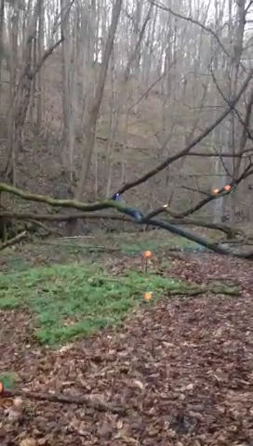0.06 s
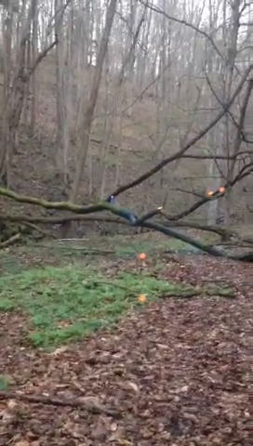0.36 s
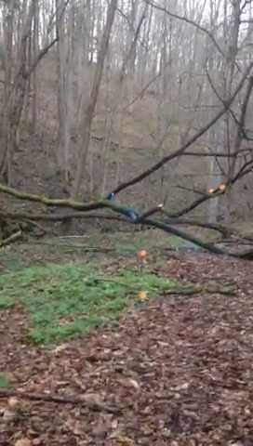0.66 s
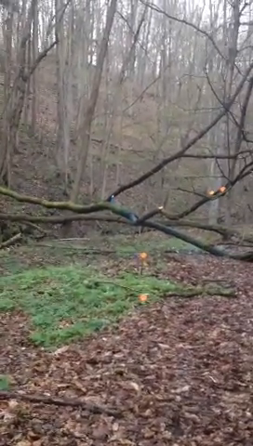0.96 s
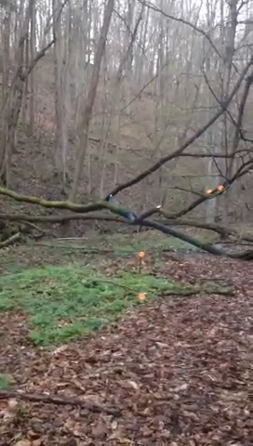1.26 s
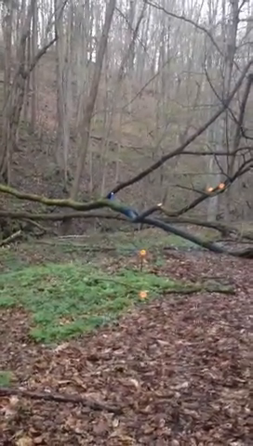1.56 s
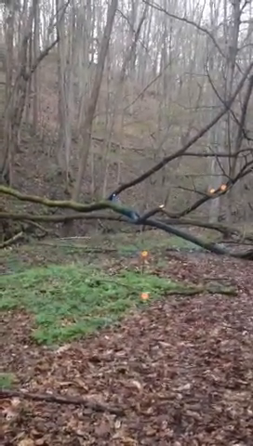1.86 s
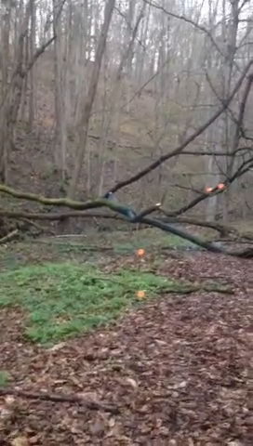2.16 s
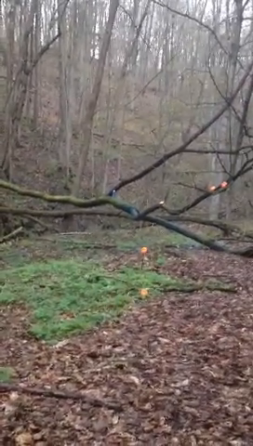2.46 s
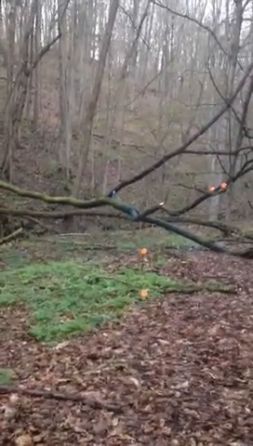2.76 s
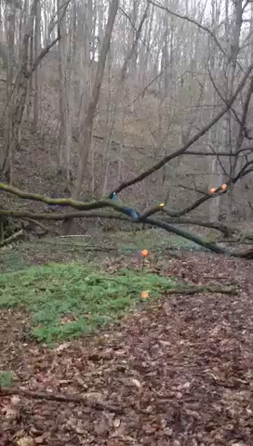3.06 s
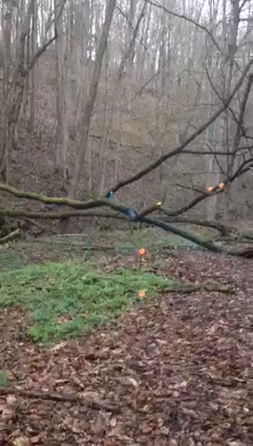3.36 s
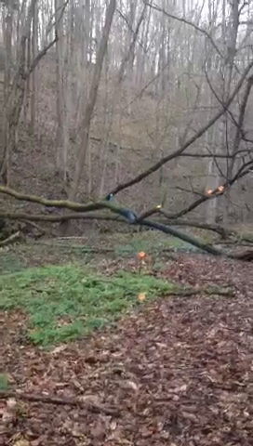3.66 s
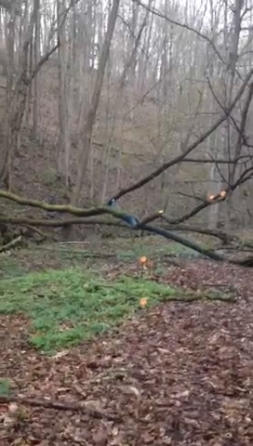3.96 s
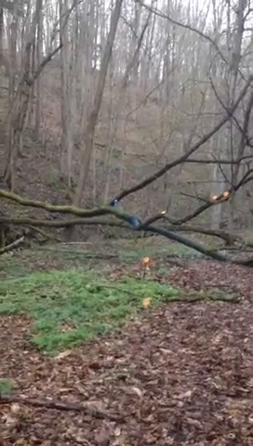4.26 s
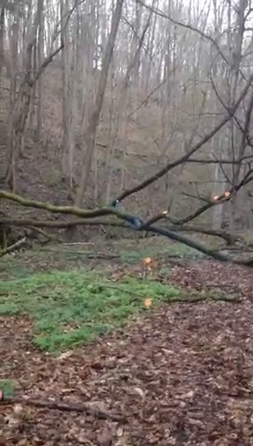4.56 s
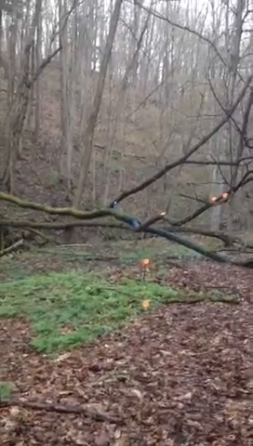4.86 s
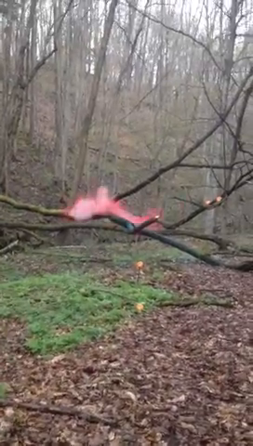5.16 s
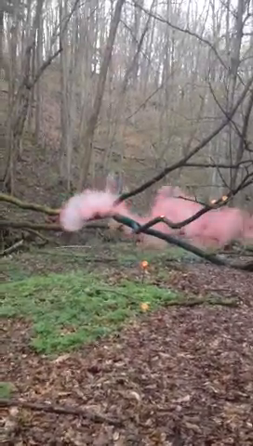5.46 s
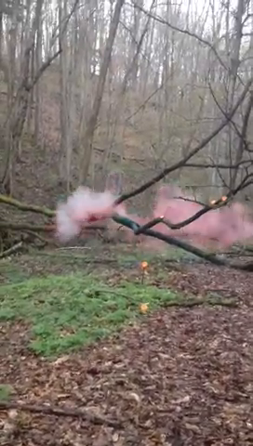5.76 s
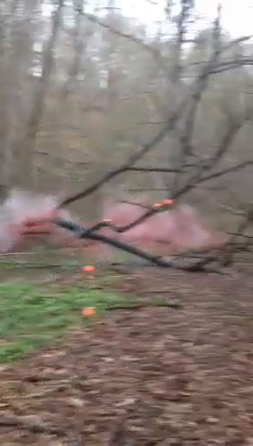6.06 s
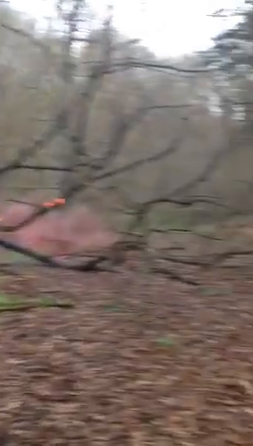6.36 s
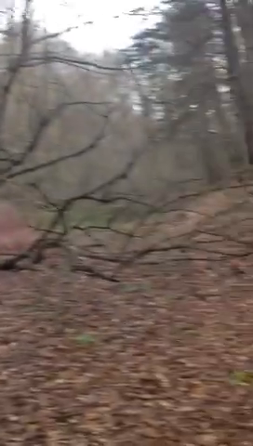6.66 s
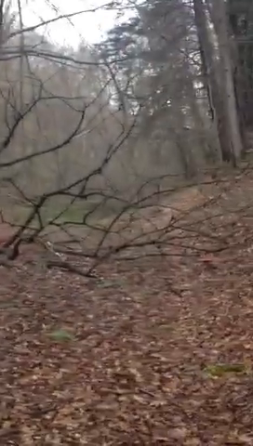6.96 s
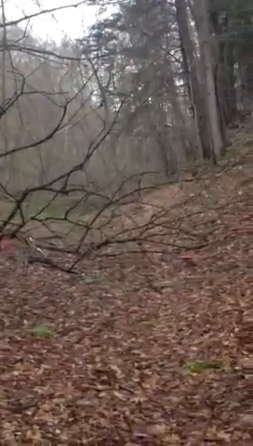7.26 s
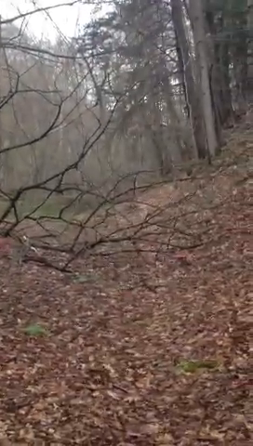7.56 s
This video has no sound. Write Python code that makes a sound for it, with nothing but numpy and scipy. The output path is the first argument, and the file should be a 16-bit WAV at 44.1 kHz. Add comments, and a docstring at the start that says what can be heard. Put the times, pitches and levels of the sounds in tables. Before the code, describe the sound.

A rifle shot cracks in quiet woods, bursting a spray can with a brief hiss and long echo, then the rifle's action clicks.

```python
"""A small-calibre rifle fires close by in a wooded valley; a moment later the bullet bursts a spray can.
Both bangs are clusters of pressure fronts. Gas sputters out of the torn can while trunks and slopes
throw the sound back, duller and duller; then the rifle's steel action clicks and rings.
Underneath: quiet forest air, a wavering far-off drone, a few twigs and rustles, faint bird peeps."""
import sys
import numpy as np
from scipy import signal
from scipy.fft import rfft, irfft, next_fast_len
from scipy.io import wavfile
from scipy.ndimage import uniform_filter1d, map_coordinates

SR = 44100
rng = np.random.default_rng(int(sys.argv[2]) if len(sys.argv) > 2 else 0)


def to_wav(s):
    """Save 16-bit WAV."""
    ch = np.atleast_2d(s).T  # columns
    pcm = np.round(np.clip(ch, -1, 1) * 32767)  # PCM
    wavfile.write(sys.argv[1], SR, pcm.astype(np.int16))


N = 340182
TIME = np.arange(N) / SR


def amp(db):
    """Decibels to gain."""
    return 10 ** (np.asarray(db) / 20)


def unit(x):
    """Scale to rms 1."""
    return x / np.sqrt(np.mean(x ** 2) + 1e-20)


def peak(x):
    """Scale to peak 1."""
    return x / np.abs(x).max()


def along(points, hz):
    """Read (f/Hz, value) points on a log frequency axis."""
    freqs, values = np.transpose(points)
    return np.interp(np.log(hz + 1), np.log(freqs + 1), values)


def automation(points):
    """Join (t/s, value) points into one value per sample."""
    return np.interp(TIME, *np.transpose(points))


def wobble(rate):
    """A smooth random curve with rate knots a second."""
    return map_coordinates(rng.standard_normal(int(N * rate / SR) + 4), [TIME * rate])


def hump(s, half):
    """A smooth rise and fall around time s."""
    return np.exp(-.5 * ((TIME - s) / half) ** 2)


def fade(t, t60, rise):
    """Envelope that rises from t = 0 and dies away."""
    t = np.maximum(t, 0)
    return (1 - np.exp(-t / rise)) * np.exp(-np.log(1000) * t / t60)


def filtered(x, response):
    """x through a response given as a function of frequency."""
    size = next_fast_len(len(x) + 8192)
    return irfft(rfft(x, size) * response(np.fft.rfftfreq(size, 1 / SR)), size)[:len(x)]


def resonance(hz, centre, width):
    """Causal response of one resonance."""
    return 1j * hz * width / (centre ** 2 - hz ** 2 + 1j * hz * width)


def knock(x, centre_hz, breadth=1.3):
    """x through the same damped resonance twice."""
    return filtered(x, lambda hz: resonance(hz, centre_hz, breadth * centre_hz) ** 2)


def noise(spectrum, size=N):
    """Noise of rms 1, coloured by (f/Hz, level/dB) points."""
    return unit(filtered(rng.standard_normal(size), lambda hz: amp(along(spectrum, hz))))


def band(centre_hz, width_hz, drift_hz):
    """Narrow noise of rms 1 whose centre wanders."""
    phase = 2 * np.pi * np.cumsum(centre_hz + drift_hz * wobble(6.5)) / SR
    return unit(wobble(width_hz) * np.sin(phase) + wobble(width_hz) * np.cos(phase))


def add(track, s, sound):
    """Mix a sound into the track at time s."""
    part = track[round(s * SR):][:len(sound)]
    part += sound[:len(part)]


def ambience():
    """A bed of steady forest air over a slowly heaving low rumble."""
    # spectra of the two layers: f/Hz, level/dB
    air_colour = [(25, 0), (60, -2), (120, 4), (400, -0.5), (700, 3.5), (1000, 3), (2000, -0.5), (4000, -4),
                  (4750, -2.5), (5050, -8), (7500, -6.5), (10000, -13.5), (15000, -10.5)]
    rumble_colour = [(25, -24), (60, -10), (90, -8), (125, 1), (180, -4), (245, 4), (320, -5.5), (400, 0),
                     (520, -17), (900, -52.5)]
    # the rumble's rise and fall: t/s, level/dB
    rumble_ride = [(0, -71.5), (.52, -61.5), (.7, -73.5), (1.05, -70), (1.5, -78.5), (1.95, -77),
                   (2.25, -69.5), (3.2, -69.5), (4.0, -76.5), (4.45, -73), (4.9, -64), (6.0, -79),
                   (6.9, -80.5), (7.35, -70), (7.7, -76)]
    rumble = amp(automation(rumble_ride) + .9 * wobble(9.9)) * noise(rumble_colour)
    air = amp(-64 - .05 * wobble(2.7)) * noise(air_colour)
    return rumble + air


def drone():
    """A hollow far-off drone wavers in two resonances and swells now and then."""
    # its slow rise and fall: t/s, level/dB
    ride = [(0, -65), (.5, -63), (1.1, -67.5), (1.8, -67.5), (2.4, -69), (3.2, -64.5), (3.9, -67.5),
            (4.9, -66), (6.3, -73.5), (7.0, -74.5), (7.7, -69)]
    # its resonances: f/Hz, width/Hz, drift/Hz, gain/dB
    hollows = [(494, 59, 11, -2), (581, 100, 18, -4.5)]
    # brief swells: t/s, level/dB, half length/s, f/Hz
    surges = [(0.07, -61, 0.073, 511), (0.473, -57.5, 0.028, 502), (1.13, -63.5, 0.056, 481),
              (1.337, -63, 0.02, 484), (2.537, -63.5, 0.061, 482), (2.862, -59, 0.026, 495),
              (2.977, -56, 0.035, 516.5), (3.65, -61, 0.044, 523), (4.03, -62, 0.045, 498.4),
              (4.824, -61, 0.034, 485), (7.568, -61.5, 0.042, 568)]
    steady = sum(amp(db) * band(hz, width, drift) for hz, width, drift, db in hollows)
    swells = sum(amp(db) * hump(s, half) * band(hz, width_hz=75, drift_hz=11)
                 for s, db, half, hz in surges)
    diffuse = amp(-73) * band(540, width_hz=260, drift_hz=20)  # scattered by the trees
    return amp(automation(ride) - .24 + 1.5 * wobble(7)) * steady + swells + diffuse


def bird():
    """A small bird gives thin rising peeps and one quick downward chip."""
    # calls: t/s, level/dB, f/Hz, half length/s, glide/(Hz/s)
    peeps = [(1.585, -68, 7150, .02, 14999), (4.723, -69, 7600, .025, 3000),
             (4.783, -53, 6500, 0.0019, -400000)]
    out = np.zeros(N)
    for s, db, hz, half, glide in peeps:
        u = np.clip((TIME - s) / half, -4, 4)
        pitch = hz * (1 + .01 * wobble(300)) + glide * half * u
        out += amp(db) * np.exp(-u ** 2) * np.sin(2 * np.pi * np.cumsum(pitch) / SR)
    return out


def handling():
    """Twigs tick and knock; clothes and dry leaves give grainy rustles."""
    # twigs and soft knocks: t/s, peak/dB, f/Hz, t60/s, bandwidth as a share of f
    twigs = [(0.351, -47.5, 1080, 0.031, 1), (0.4392, -48, 1330, .03, 0.97),
             (0.4768, -38, 2000, 0.007, 1.2), (.523, -47, 870, 0.11, 1.1), (0.578, -48, 1500, 0.017, 1.4),
             (1.8978, -51.5, 4000, .04, .4), (1.901, -55, 1110, 0.049, .5), (2.1891, -60, 2680, .07, .12),
             (3.4298, -56, 3400, .015, .25), (3.73, -54, 4600, 0.023, .18), (4.4954, -56, 4300, .02, .3),
             (5.5863, -38, 9000, .025, 1.3), (5.6397, -40, 7500, .015, 0.82), (5.7105, -43, 9000, .02, 1.3),
             (5.718, -49.5, 250, .1, 0.51), (5.9485, -52, 6200, .025, .25), (7.0929, -59, 5500, .01, .5)]
    # clothes and leaves stirring: t/s, level/dB, half length/s
    rustles = [(0.213, -60, 0.055), (0.475, -68, 0.12), (0.572, -59.5, 0.025), (5.596, -52, 0.0084),
               (5.648, -59, 0.008), (5.726, -49.5, 0.016), (5.786, -59, 0.026), (6.053, -63.5, 0.015),
               (6.141, -58.5, 0.04), (6.336, -60, 0.032), (6.434, -64.5, 0.025), (6.51, -66, 0.045),
               (6.832, -70, 0.09)]
    # rustle spectrum: f/Hz, level/dB
    leaf_colour = [(40, -30), (100, -14), (250, 6), (1000, 5), (4500, 2.5), (7500, 2), (10000, -3.5),
                   (15000, -5)]
    out, t = np.zeros(N), TIME[:SR // 8]
    for s, db, pitch_hz, t60, breadth in twigs:
        contact = rng.standard_normal(len(t)) * fade(t, t60, rise=.000083)
        add(out, s, amp(db) * peak(knock(contact, pitch_hz, breadth)))
    stir = sum(amp(db) * hump(s, half) for s, db, half in rustles)
    grain = unit(noise(leaf_colour) * amp(1.8 * wobble(460) + 1.7 * wobble(90)))
    return out + stir * grain


def action(bounces_per_s=460):
    """Each steel contact in the rifle's action snaps, chatters and rings the parts at new strengths."""
    # contacts: t/s, level/dB, low ring/dB, low ring/Hz, treble/dB, snap/Hz
    clicks = [(6.099, -50, -11, 1920, -19, 7500), (6.119, -41, -7, 1896, -27, 3500),
              (6.128, -45, -12, 2030, -20, 5500), (6.1922, -46, -18, 1930, -18, 7000),
              (6.2702, -37, -23, 1980, -4, 12000), (6.3922, -39.5, -13, 2300, -5, 7500),
              (6.4226, -43.5, -10, 2010, -16, 6000), (6.5376, -46, -17, 1940, -12, 6000),
              (6.5886, -37.5, -18.5, 1900, -23, 6400), (6.608, -45, -1.5, 1900, -26, 3500),
              (6.7322, -41, -14.5, 2300, -18, 7400), (6.776, -49, -10, 1960, -20, 4000),
              (6.7966, -37.5, -12, 1905, -26, 5500), (6.8132, -43, -11, 2020, -28, 5500),
              (6.8349, -34.5, -17.5, 2220, -16, 6200), (6.879, -45.5, -12, 2030, -9, 7000),
              (7.2768, -47.5, -13, 1930, -12, 6000)]
    # modes of the steel: f/Hz, level/dB, t60/s
    steel = [(2250, -9, .092), (2870, -17, .07), (3760, -3, 0.066), (3990, -2.5, .045), (5600, -13, .05),
             (6630, -13, .05), (7240, -5, .045), (9400, -19, .05), (10800, -10, .05), (11400, -13, .06)]
    out, t = np.zeros(N), TIME[:SR // 4]
    for s, db, ring_db, ring_hz, treble_db, snap_hz in clicks:
        strike = [(hz * rng.normal(1, .02), level + rng.normal(0, 3.5), t60) for hz, level, t60 in steel]
        modes = sum(amp(level) * np.sin(2 * np.pi * hz * t) * fade(t, t60, rise=.00022)
                    for hz, level, t60 in strike)
        waver = np.cumsum(rng.normal(0, .09, len(t)))
        low_ring = np.sin(2 * np.pi * ring_hz * t + waver) * fade(t, t60=.09, rise=.0006)
        # light, bright contacts ring the parts less than heavy, dull ones
        ring = amp(-24 - treble_db / 3) * modes + amp(ring_db) * low_ring
        colour = [(100, -48), (600, -3), (2000, -12), (4000, -7.5), (7000, -6),
                  (10000, treble_db + 3), (15000, treble_db + 2)]
        tick = amp(-14.5) * noise(colour, size=len(t)) * fade(t, t60=.032, rise=.00017)
        bounces = rng.standard_normal(len(t)) * (rng.random(len(t)) < bounces_per_s / SR)
        bounces *= fade(t, t60=.077, rise=.001)
        contact = rng.standard_normal(len(t)) * fade(t, t60=.008, rise=.0001)
        snap = peak(filtered(contact, lambda hz: resonance(hz, snap_hz, snap_hz / 4)))
        chatter = amp(-8.5) * signal.fftconvolve(bounces, snap)[:len(t)]
        scrape = amp(-26.5) * noise(colour, size=len(t)) * fade(t, t60=.22, rise=.0038)
        add(out, s, amp(db) * (ring + amp(-5) * snap + chatter + tick + scrape))
    return out


def forest(start_s=5.06, returns_per_s=1500):
    """Countless trunks scatter the bang; the longer the path, the more treble the air has taken."""
    # starting spectrum of the echo: f/Hz, level/dB
    colour = [(40, -41.5), (75, -28.5), (120, -13.5), (250, -9.5), (450, -10.5), (700, -6), (1000, -4),
              (1800, -0.5), (3000, 1), (4700, 2.5), (5100, -2.5), (7500, 0.5), (10000, -5.5), (15000, -11)]
    # its decay: f/Hz, t60/s
    decay = [(60, 0.42), (150, 1.4), (300, 1.3), (600, 3.16), (1200, 2.77), (2000, 2.4), (3200, 1.52),
             (4500, 1.37), (7500, 1.01), (11000, 0.85), (15000, 0.87)]
    # hillsides sending back broad waves of echo: t/s, gain/dB, half length/s
    hillsides = [(5.117, 2, 0.034), (5.24, 2, 0.025), (5.896, 2.5, 0.12)]
    returns = rng.standard_normal(N) * (rng.random(N) < returns_per_s / SR)
    scatter = rng.standard_normal(N) + amp(-7) * unit(returns)
    scatter = unit(filtered(scatter, lambda hz: amp(along(colour, hz))))
    hz, t, spectrogram = signal.stft(scatter, SR, nperseg=512)
    loss = np.exp(-np.log(1000) * np.maximum(t - start_s, 0) / along(decay, hz)[:, None])
    # groups of trees favour different bands from moment to moment
    patches = uniform_filter1d(rng.standard_normal(spectrogram.shape), size=7, axis=0)
    groves_db = unit(uniform_filter1d(patches, size=5, axis=1))
    tail = signal.istft(spectrogram * loss * amp(groves_db), SR, nperseg=512)[1][:N]
    hills_db = sum(db * hump(s, half) for s, db, half in hillsides)
    # the echo builds as the bang reaches more trees
    build_db = -5.5 * np.exp(-np.maximum(TIME - start_s, 0) / .028)
    onset = np.clip((TIME - start_s) / .005, 0, 1)
    return amp(-22.5 + hills_db + build_db + .77 * wobble(55)) * tail * onset


def trunks():
    """Each trunk returns the crack as one crisp slap; the brush around it adds a short, duller scatter."""
    # reflections: t/s, slap peak/dB, slap/Hz, brush/dB, brush/Hz, brush t60/s
    echoes = [(5.0748, -12, 4500, -28, 3500, .03), (5.0952, -7, 4500, -25, 3000, .025),
              (5.0999, -11, 5000, -28, 3000, .04), (5.1243, -19, 4500, -28, 4500, .02),
              (5.1593, -14, 4000, -29, 3000, .04), (5.1798, -6, 2700, -17.5, 2400, .018),
              (5.1935, -21, 2000, -29, 1200, .04), (5.2383, -10.5, 2200, -21, 1500, .04),
              (5.2765, -22, 2300, -35, 2000, .04), (5.3375, -24, 1600, -31, 1400, .05),
              (5.8153, -29, 1500, -39, 1300, .02)]
    out, t = np.zeros(N), TIME[:SR // 10]
    for s, slap_db, slap_hz, brush_db, brush_hz, t60 in echoes:
        u = np.pi * (slap_hz * t - 1)
        slap = (2 * u ** 2 - 1) * np.exp(-u ** 2)  # push, pull, push
        brush = unit(knock(rng.standard_normal(len(t)), brush_hz)) * fade(t, t60, rise=.0007)
        add(out, s, amp(slap_db) * slap + amp(brush_db) * brush)
    return out


def thuds():
    """Ground and slope answer the shot and the burst with a short, dull thud each."""
    # low returns: t/s, level/dB, f/Hz, t60/s
    returns = [(5.052, -28, 331, .05), (5.132, -29, 520, .11)]
    out, t = np.zeros(N), TIME[:SR // 4]
    for s, db, hz, t60 in returns:
        body = unit(knock(rng.standard_normal(len(t)), hz))
        add(out, s, amp(db) * body * fade(t, t60, rise=.001))
    return out


def gas():
    """The torn can empties in one sputtering hiss as its pressure falls."""
    # spectrum of the jet: f/Hz, level/dB
    jet = [(80, -59), (300, -16.5), (1500, 13), (3000, 8.5), (4700, -5), (5200, 5.5), (8000, -2.5),
           (10000, -10.5), (15000, -40.5)]
    sputter = unit(amp(wobble(60) + 1.5 * wobble(350)))
    return amp(-28) * sputter * noise(jet) * fade(TIME - 5.133, t60=.66, rise=.075)


def zing():
    """A bright ring hangs on for a moment after the shot."""
    # its resonances: f/Hz, width/Hz, gain/dB
    peaks = [(4500, 650, -1), (8000, 700, -9), (12180, 12000, -13.5)]
    ring = filtered(rng.standard_normal(N),
                    lambda hz: sum(amp(db) * resonance(hz, centre, width) for centre, width, db in peaks))
    gate = np.interp(TIME, [5.095, 5.125], [1, 0])  # shut before the can bursts
    return amp(-15) * unit(ring) * fade(TIME - 5.061, t60=.45, rise=.012) * gate


def bangs(push_cycles=6):
    """Each pressure front is a push of air that swings a few times, under a crack of turbulence."""
    # fronts of the shot, then of the bursting can: t/s, crack/dB, crack t60/s, push/dB, push/Hz
    fronts = [(5.0447, -31, .03, -42, 600), (5.0466, -9, .018, -4, 1800), (5.0505, -14, .014, -10, 1500),
              (5.0519, -9, .012, -15, 850), (5.0531, -9, .012, -20, 520), (5.0545, -23, .04, -20, 225),
              (5.0594, -19, .02, -1, 1850), (5.0617, -12, .04, -18, 780), (5.1299, -1.5, .004, -3, 5600),
              (5.1311, -1, .004, -4, 4400), (5.1345, -34, .02, -31, 230), (5.1330, -30, .02, -12, 1000)]
    # spectrum of the crack: f/Hz, level/dB
    colour = [(100, -27), (500, 1.5), (1200, -5.5), (2600, 0.5), (4500, -2), (5500, -3), (7800, 1.5),
              (10000, -1.5), (15000, -7.5)]
    out, t = np.zeros(N), TIME[:SR // 8]
    for s, crack_db, t60, push_db, push_hz in fronts:
        crack = noise(colour, size=len(t)) * fade(t, t60, rise=.0002)
        push = np.sin(2 * np.pi * push_hz * t) * fade(t, push_cycles / push_hz, rise=.0001)
        add(out, s, amp(crack_db) * crack + amp(push_db) * push)
    return out


def scene():
    """Shot, burst and their echoes over the quiet wood, in mono."""
    shot = bangs() + thuds() + zing() + gas() + trunks() + forest()
    return (shot + action() + handling() + bird() + drone() + ambience())[None]


def record(dry, ceiling=.58, low_cut_hz=140, top_hz=15450):
    """The microphone rounds off the loudest peaks, thins the bass and cuts the highest treble."""
    squeezed = dry[0] / (1 + np.abs(dry[0] / ceiling) ** 8) ** (1 / 8)
    thinned = signal.sosfilt(signal.butter(3, low_cut_hz, "highpass", fs=SR, output="sos"), squeezed)
    return filtered(thinned, lambda hz: 1 / (1 + (hz / top_hz) ** 200))[None]


dry = scene()
out = record(dry)
to_wav(out)
```